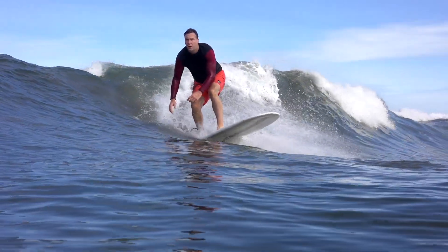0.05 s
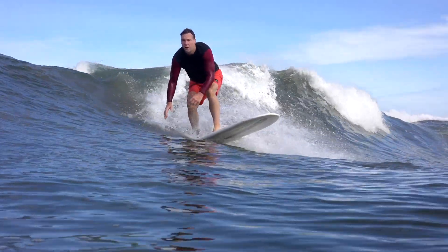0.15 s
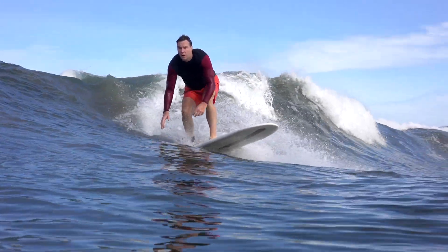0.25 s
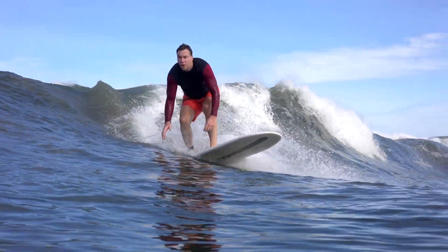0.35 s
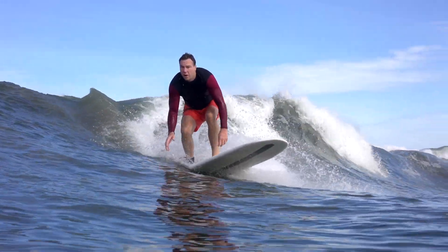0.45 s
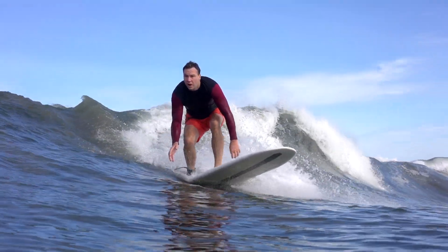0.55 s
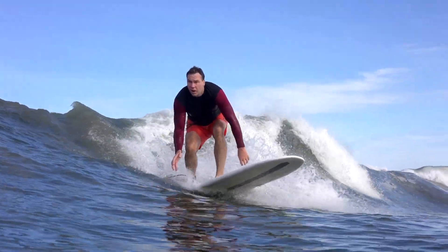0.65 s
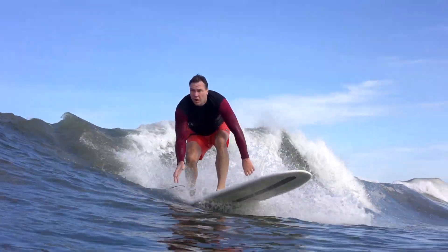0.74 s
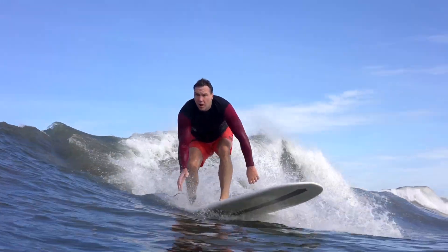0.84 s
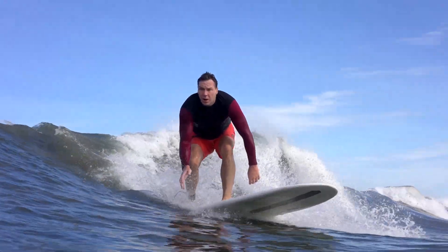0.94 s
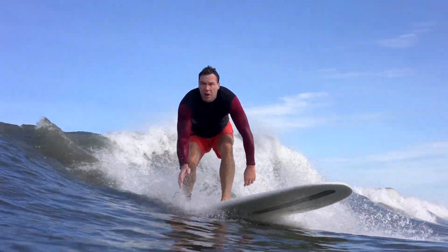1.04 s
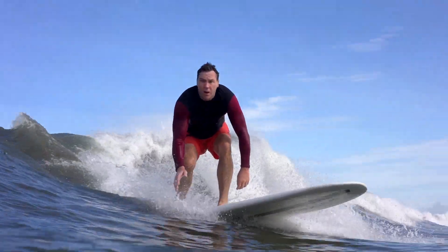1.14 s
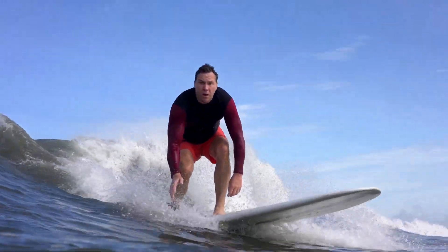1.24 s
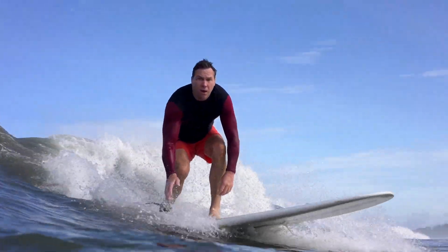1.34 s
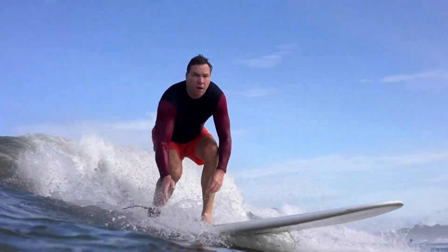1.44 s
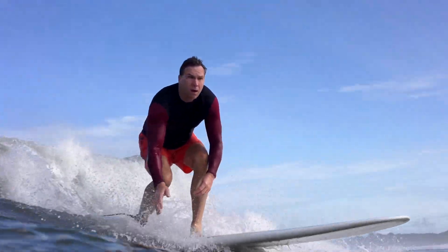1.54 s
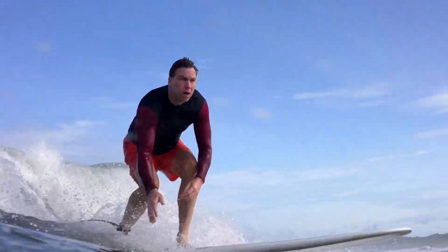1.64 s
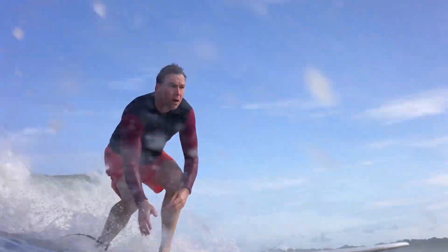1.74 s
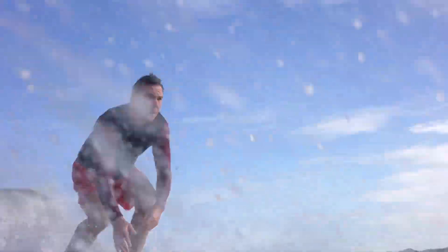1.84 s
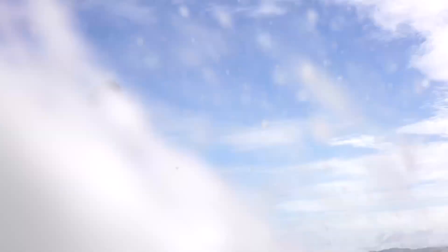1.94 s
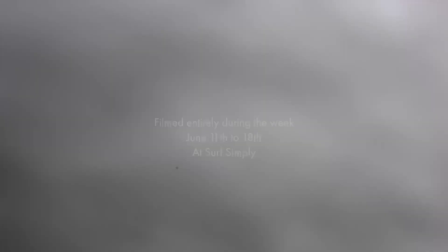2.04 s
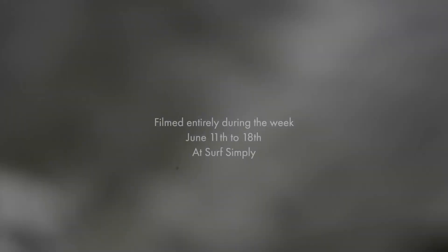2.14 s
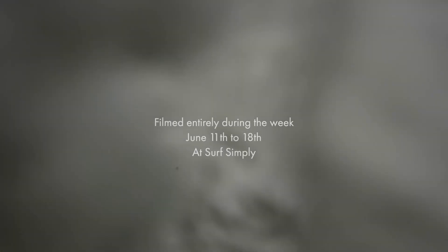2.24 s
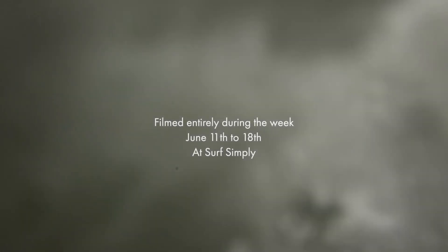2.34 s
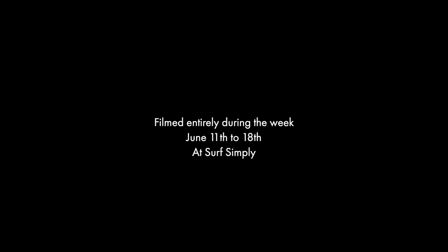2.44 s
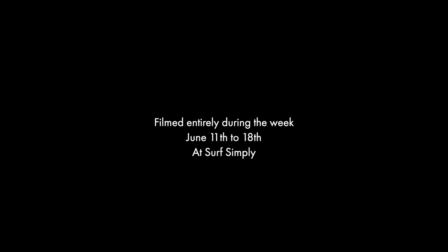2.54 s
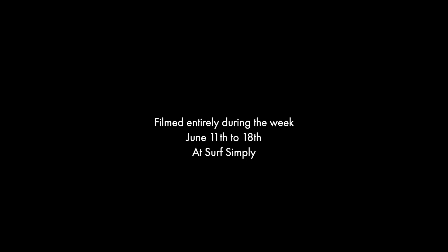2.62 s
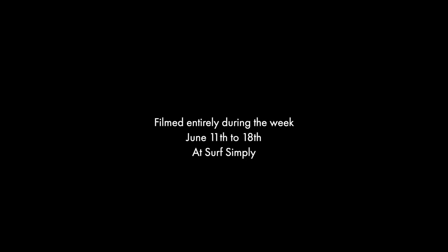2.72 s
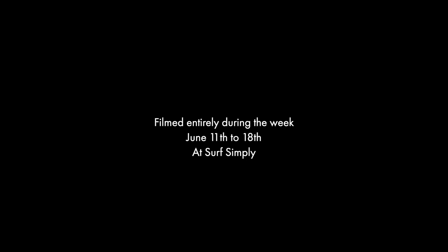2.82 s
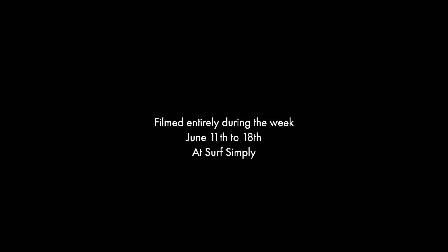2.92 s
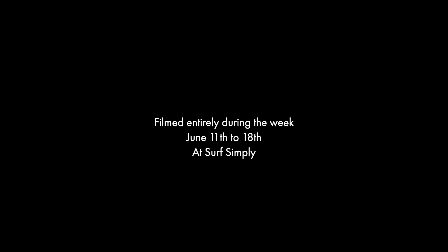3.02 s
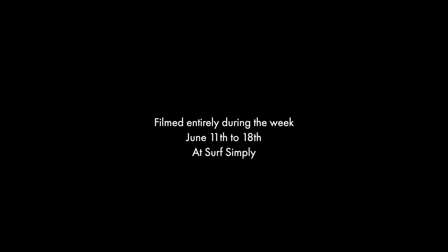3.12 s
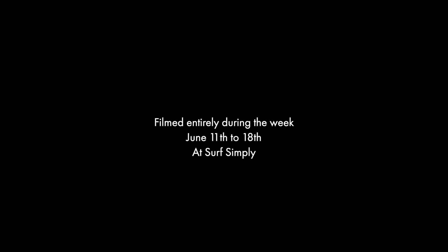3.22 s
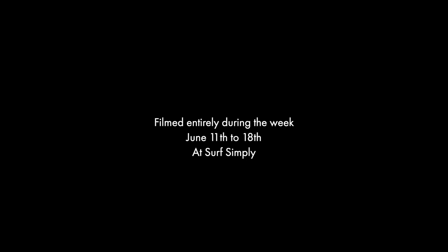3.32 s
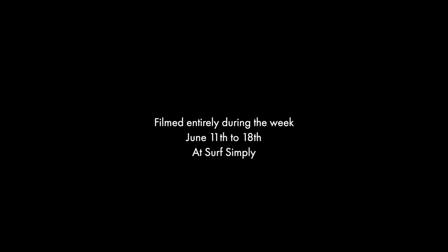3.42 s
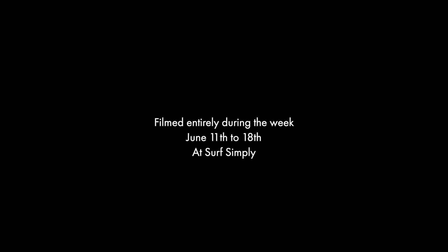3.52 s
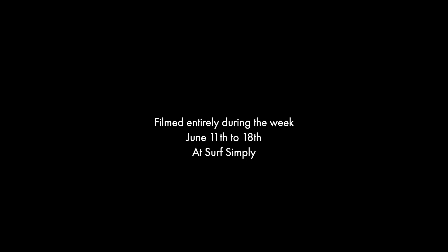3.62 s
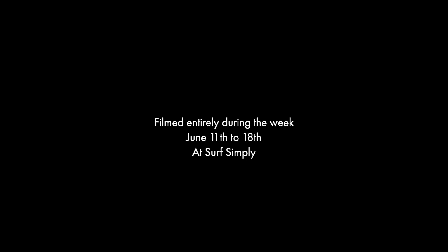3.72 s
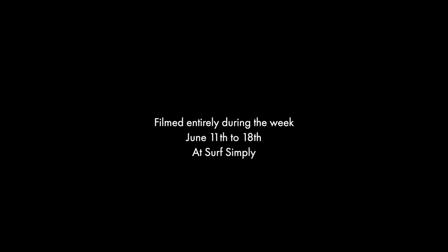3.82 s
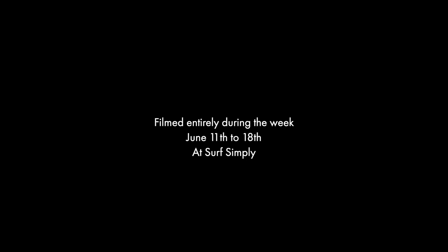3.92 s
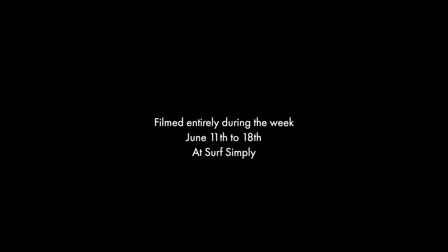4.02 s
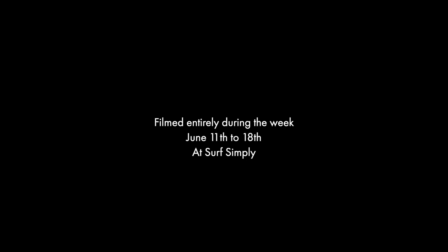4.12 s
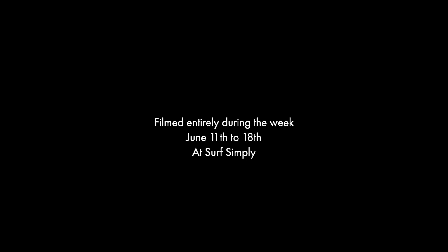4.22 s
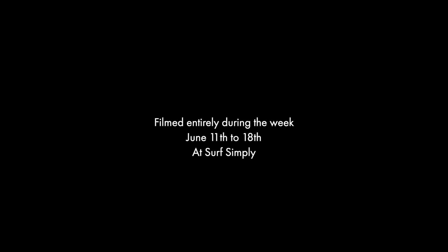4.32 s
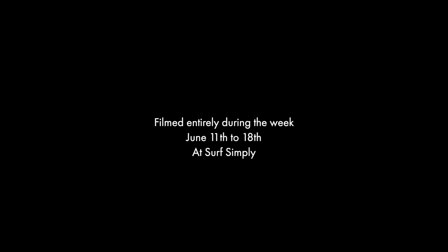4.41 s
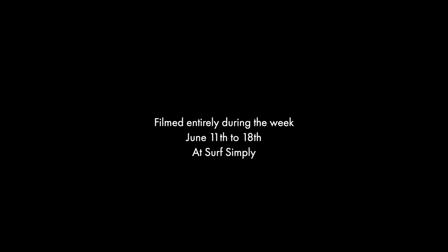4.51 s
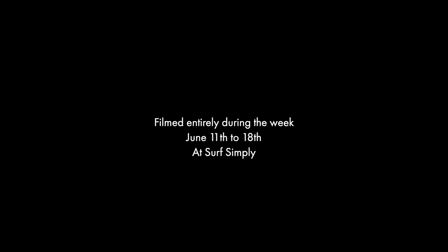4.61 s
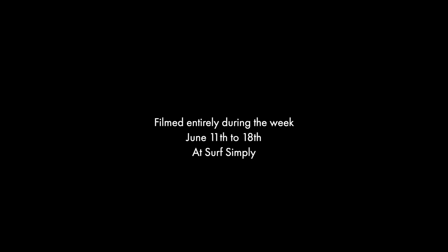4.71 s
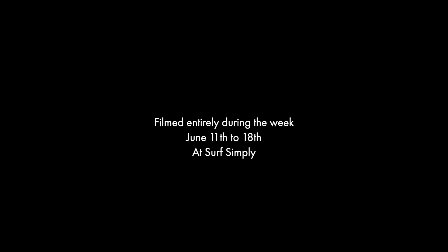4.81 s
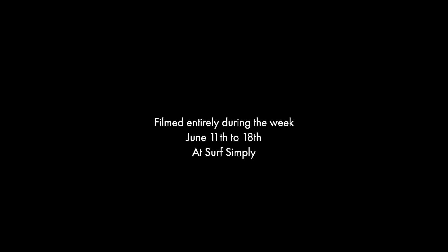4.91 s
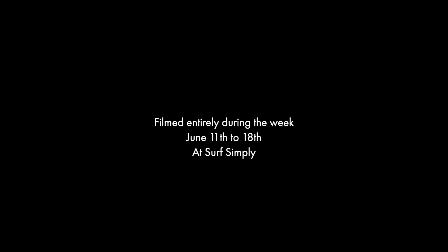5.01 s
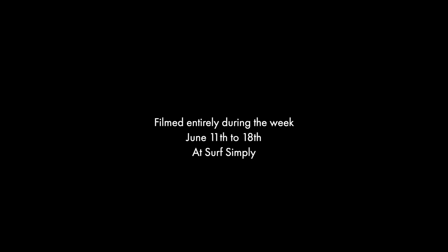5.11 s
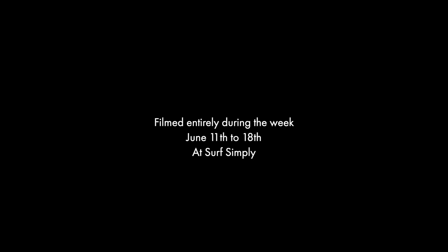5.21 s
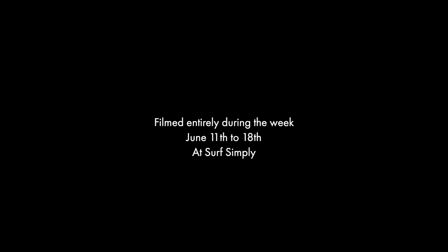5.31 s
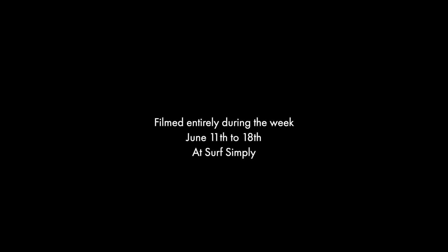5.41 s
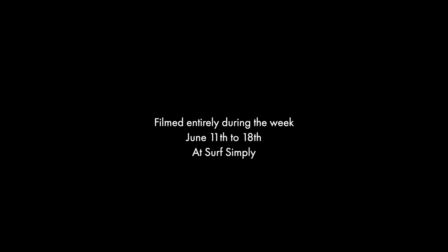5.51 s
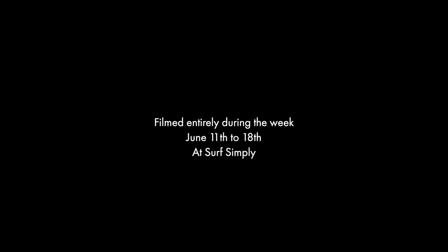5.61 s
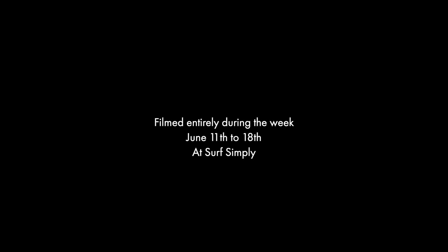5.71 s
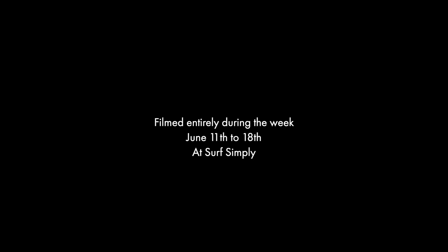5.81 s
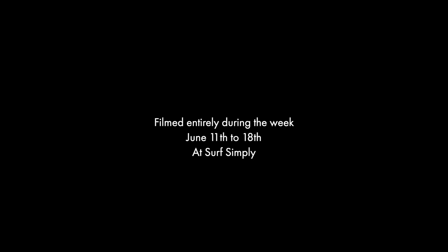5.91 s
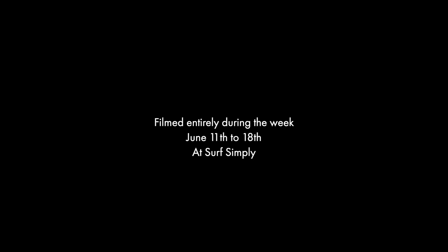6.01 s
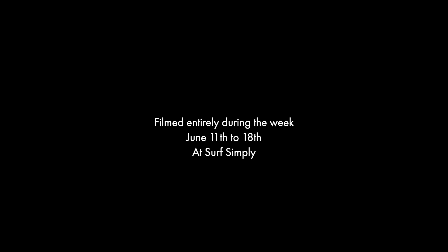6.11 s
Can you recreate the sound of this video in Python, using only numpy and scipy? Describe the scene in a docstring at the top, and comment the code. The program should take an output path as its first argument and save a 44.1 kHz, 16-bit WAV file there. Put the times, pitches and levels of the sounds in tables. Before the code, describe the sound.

Close on the water, a thin wash of surf grows into a bright rushing hiss, then a wave slams over the microphones inside a sealed plastic casing. Low turbulent rumble and gulps follow, fading to a muffled near-hush underwater. A splash breaks it, then hollow thumps, plasticky slaps, bubbles and draining drips continue in irregular surges.

```python
"""Water slaps and churns on the walls of a sealed plastic camera housing afloat in the surf, and they ring.
A wave nears, slams over it, ducks it under, and it surfaces in draining foam. Shaped noise makes the churn,
short bursts and tones the drops; their pushes excite wall modes, alike or opposed in the two microphones.
Low noise of turbulence and rising gulps of air move the whole body. Faint surf and hiss lie behind."""
import sys
import numpy as np
from scipy import signal
from scipy.fft import rfft, irfft
from scipy.io import wavfile
from scipy.ndimage import uniform_filter1d

SR = 44100
rng = np.random.default_rng(int(sys.argv[2]) if len(sys.argv) > 2 else 0)


def persist_wave(psi):
    """Save psi, clipped to +-1, as 16-bit WAV."""
    counts = np.round(np.clip(psi, -1, 1) * 32767).astype(np.int16)
    wavfile.write(sys.argv[1], SR, np.atleast_2d(counts).T)


N = 271215  # length in samples

# Churn of water on the walls, before random flecks: [t/s, wash level/dB, spray level/dB, fizz level/dB]
CHURN_LEVELS = [(0.0, -43.5, -51.5, -61), (0.31, -44, -51, -57.5), (0.58, -40.5, -44, -46),
                (0.86, -33, -35.5, -39), (1.35, -31, -34.5, -35.5), (1.66, -26, -30, -26),
                (1.8, -15.5, -21.5, -21.5), (1.93, -19.5, -25, -27.5), (2.12, -22.5, -30, -35),
                (2.28, -29.5, -35.5, -38), (2.43, -42.5, -41, -48), (2.68, -52, -63, -61),
                (2.95, -61, -74.5, -83), (3.16, -48, -69, -68), (3.24, -31, -25.5, -38),
                (3.34, -33, -29, -31), (3.7, -41.5, -45, -52), (3.99, -40, -40.5, -48.5),
                (4.45, -30.5, -42, -51), (4.77, -33.5, -48.5, -51), (5.0, -48.5, -60, -63),
                (5.21, -34, -54, -55), (5.65, -41, -49.5, -58), (5.93, -30.5, -51, -50),
                (6.15, -48.5, -38, -61)]
# Pitch ranges of wash, spray and fizz: [lowest f/Hz, highest f/Hz]
CHURN_BANDS = [(880, 1700), (2200, 6000), (6000, 16000)]
# Turbulence shoving the body, before random lumps: [t/s, low level/dB, middle level/dB, upper level/dB]
SHOVE_LEVELS = [(0.0, -54, -64, -50.5), (0.39, -69, -57, -59), (1.63, -54.5, -42, -35.5),
                (1.8, -29.5, -28.5, -20.5), (2.14, -22, -21.5, -21), (2.5, -34, -35.5, -48),
                (2.53, -40, -37, -33), (2.6, -36, -38, -44.5), (2.91, -41.5, -36.5, -50),
                (3.05, -40, -38, -35.5), (3.37, -38, -33, -46.5), (3.84, -45, -32, -44.5),
                (3.89, -28, -20.5, -36), (4.02, -21, -27.5, -38), (4.08, -22, -21, -36.5),
                (4.2, -27.5, -11.5, -38), (4.25, -45, -27.5, -34), (4.33, -49, -32, -33.5),
                (4.97, -55, -41.5, -41), (5.38, -44.5, -37, -32.5), (5.7, -54.5, -44, -56),
                (5.75, -50, -39, -47), (5.84, -47, -51.5, -36), (6.15, -42, -47.5, -47)]
# Pitch ranges of the deep, low, middle and upper shoves: [lowest f/Hz, highest f/Hz]
SHOVE_RANGES = [(25, 65), (65, 150), (150, 350), (350, 700)]
# Tone colour of the shoves: [f/Hz, level per Hz/dB]
SHOVE_TONE = [(15, -66.5), (25, -67.5), (81, -4.5), (130, 2), (200, -1.5), (246, -0.5), (537, -19.5),
              (592, -20.5), (700, -32.5), (910, -24.5), (1540, -120)]
# Rocking of the body, opposite in the two microphones: [f/Hz, width/Hz, level/dB]
BODY_ROCKING = (144, 20, -9)
# Clearest drops, slaps and pops on the walls:
# [t/s, level/dB, centre f/Hz, spread/octaves (at least 0.06), one-sided share/0-1, length/ms (at least 1)]
WALL_DROPS = [(1.597, 11, 9100, 0.33, 0.44, 2.5), (1.623, 7, 9200, 0.83, 0.6, 9.2),
              (1.632, -2.5, 1556, 0.2, 0.47, 4.4), (1.64, 11, 8500, 0.36, 0.53, 1.9),
              (1.66, 8, 10000, 1.1, 0.45, 14), (1.687, 7.5, 6860, 1.37, .6, 7.3),
              (1.714, 12, 10600, 0.49, 0.6, 2.3), (1.863, 3, 7700, 1.2, 1, 8.7),
              (2.212, -1.5, 3190, 1.14, 0.28, 18), (2.244, -5, 8950, .31, 0.5, 6.4),
              (2.258, -8, 1120, 1.2, 0.84, 14), (2.394, -7, 9200, 0.49, .44, 3.7),
              (2.5, -24, 2420, .082, .66, 3.2), (2.532, -14, 950, 0.38, 0.07, 3.9),
              (2.57, -21, 912, 0.17, 0.03, 8.9), (2.6, -26, 3660, 0.27, 0.4, 6),
              (2.602, -12, 9700, 0.11, 0.6, 1.6), (2.617, -18.5, 7200, 0.46, 0.5, 3.2),
              (2.63, -24, 715, 0.16, .2, 6), (2.689, -16, 923, 0.26, 0.12, 4.3),
              (2.788, -40.5, 2010, 0.34, .1, 8), (2.868, -29, 1460, 0.32, 0.2, 10.6),
              (3.111, -28.5, 4040, 0.077, 0.67, 17), (3.153, -23.5, 2120, 0.76, 0.14, 4),
              (3.171, -18, 4200, 0.65, .5, 13), (3.202, -14.5, 1510, 0.38, 0.57, 9),
              (3.204, -8.5, 4260, 2.1, 0.5, 28), (3.247, -4, 10100, .15, 0.68, 13),
              (3.37, 3.5, 12600, 0.091, 0.47, 3.5), (3.435, 0.5, 11000, 0.64, 0.75, 1.1),
              (3.473, -15, 1810, 1.1, 0.2, 25), (3.51, -5, 2445, 0.2, 0, 5.5),
              (3.573, -11.5, 4600, 1.6, 0.2, 9.4), (3.629, -11.5, 4890, 0.71, .63, 8.8),
              (3.743, -13.5, 5850, 0.39, 0.56, 3), (3.764, -16.5, 3900, .074, 0.66, 8.3),
              (3.889, -17.5, 1304, 0.2, .91, 5.8), (3.911, -16, 10400, 0.098, 0.6, 4),
              (4.021, -5.5, 4300, 0.21, 0.46, 1.8), (4.042, -9.5, 2330, 0.3, 0.5, 5.4),
              (4.046, -11.5, 8000, 1.5, 0.44, 9.6), (4.041, -8, 12300, 0.11, .46, 5),
              (4.066, -9.5, 5660, .15, 0.55, 5.9), (4.125, -5, 4530, 0.13, 0.64, 1.4),
              (4.232, -8, 1360, .38, .63, 2.4), (4.276, -17.5, 2250, 0.9, 0.55, 12),
              (4.294, -6, 820, .11, 0.28, 1.9), (4.328, -10.5, 2970, 0.36, 0.85, 8.5),
              (4.35, -3.5, 854, .053, .2, 3.2), (4.363, -1, 5390, 1.1, 0.82, 5.4),
              (4.386, -6.5, 13000, 0.4, 0.6, 9.3), (4.398, -9, 860, 0.32, 0.96, 3.8),
              (4.403, -9, 2300, 0.38, 0.8, 6), (4.465, -15.5, 980, 0.62, 1, 5.5),
              (4.479, -10, 970, .46, 0.64, 5.7), (4.501, -3, 3650, 0.71, 0.64, 6.5),
              (4.531, -10.5, 1460, 1.4, 0.63, 9), (4.557, -3, 5500, 0.52, 0.53, 2.9),
              (4.584, -17.5, 986, .17, 0.35, 4.8), (4.6, -10.5, 8500, 0.9, 0.4, 10),
              (4.608, -13, 1280, 0.38, 0.68, 6), (4.674, -21, 3810, 1.2, 0, 1.5),
              (4.689, -16.5, 890, 0.089, 0.16, 2.8), (4.741, -12.5, 2540, 2.1, 0.45, 8.5),
              (4.8, -19, 1160, 0.35, 0.35, 10), (4.808, -15, 8400, 0.22, .36, 3.8),
              (4.937, -7.5, 10800, 0.56, 0.7, 3.8), (5.159, -22, 4120, .12, 0.97, 4.4),
              (5.223, -12, 2310, 2.5, 0.75, 49), (5.234, -14, 780, 0.22, 0.86, 2.3),
              (5.255, -7.5, 7300, 0.39, 0.7, 11), (5.277, -9.5, 1100, 0.46, .5, 7),
              (5.335, -16, 826, 0.6, 0.94, 21), (5.37, -17.5, 3600, .3, .35, 4.9),
              (5.402, -13, 850, 0.33, 0.94, 1.4), (5.429, -15, 960, .74, 0.5, 4.3),
              (5.442, -21, 2970, 0.37, 0.6, 12), (5.461, -11, 4520, 0.085, 0.5, 2.3),
              (5.582, -11, 1600, 0.44, 0.68, 10.7), (5.619, -4.5, 697, .19, 0.59, 2.1),
              (5.694, -10, 3360, 0.15, 0.2, 3.7), (5.742, -18.5, 1520, 0.48, 0.7, 6.2),
              (5.753, -9, 760, 0.4, 0.23, 11.6), (5.802, -4.5, 3080, 0.21, 0.98, 0.69),
              (5.813, -17, 1370, 1.2, 0.55, 11), (5.859, -14, 4470, 1.8, .3, 2.6),
              (5.876, -6, 8750, 0.31, 0.66, 2.2), (5.899, -12, 1020, .77, 0.6, 10),
              (5.927, -11.5, 2940, 2.3, .6, 13), (5.95, -14.5, 820, 0.43, 0.3, 12),
              (5.973, -14, 2060, 0.59, 0.78, 5.5), (5.991, -16.5, 2330, 0.21, .3, 5.5),
              (6.032, -2.5, 4700, 0.63, 0.5, 4.2), (6.094, -1.5, 4870, 0.77, 0.5, 3.7),
              (6.118, -17, 6270, 0.28, 0.5, 6.9)]
# Air pockets gulping against the body: [t/s, level/dB, f/Hz at the middle, length/ms (at least 5)]
AIR_GULPS = [(1.697, -17.5, 414, 8.3), (1.82, -15.5, 200, 6), (1.832, -11, 297, 4), (1.879, -15, 168, 6.5),
             (2.055, -12, 176, 3.6), (2.152, -32, 171, 7.2), (2.368, -14, 201, 4.2), (2.536, -24, 435, 16),
             (3.284, -27, 245, 5.3), (3.348, -27, 172, 21), (3.575, -20.5, 292, 3),
             (3.634, -17.5, 222, 5.2), (3.889, -10, 159, 11), (3.909, -7.5, 238, 4.1),
             (3.955, -15.5, 123, 38), (4.091, -6, 268, 2.6667), (4.167, -7, 236, 8), (4.179, -12, 190, 17),
             (4.208, -23, 274, 4.4), (4.326, -19, 302, 16), (4.348, -18, 284, 3.6), (4.383, -16.5, 282, 10),
             (4.508, -20, 330, 13), (4.642, -14, 366, 4.2), (4.669, -23.5, 373, 7.3),
             (4.706, -18.5, 358, 6.1), (5.404, -22.5, 235, 11), (5.742, -20, 267, 3.5),
             (5.766, -21, 332, 9.6), (5.925, -19.5, 500, 11), (6.033, -25.5, 93, 13)]
# Ringing modes of the housing: [f/Hz, width/Hz, level/dB, left over right/dB, 1 alike or -1 opposed]
HOUSING_MODES = [(837, 33, 42.5, 1.5, -1), (945, 64, 31.5, -5, 1), (1150, 50, 13, -11, 1),
                 (1297, 73, 33.5, 1, 1), (1480, 64, 18.5, -19.5, 1), (1569, 63, 34.5, 4, -1),
                 (1940, 55, 13, 10, -1), (2431, 133, 20.5, -9.5, 1), (2860, 76, 14, 11.5, -1),
                 (3310, 38, 5, 22.5, -1), (3550, 114, 1, 25, -1), (3896, 140, 15, 1, 1),
                 (4294, 72, 1.5, 27.5, 1), (4560, 130, 2.5, 17, 1), (4800, 220, 8.5, -4, -1),
                 (4850, 47, 5, -14.5, 1), (6070, 150, -0.5, -3, -1), (6300, 150, -37.5, -11, 1),
                 (6820, 70, -3, -16, 1), (7800, 400, 0.5, -13.5, 1), (8400, 590, -2, 9, -1),
                 (9010, 130, -5.5, -26.5, 1), (10070, 470, -4.5, -9, 1), (10820, 180, -2.5, -14, 1)]
# What the walls pass between the modes: [f/Hz, even push level/dB, one-sided push level/dB]
WALL_PASS = [(199, 17.5, -37.5), (504, 18, 8.5), (780, 22.5, 36), (1112, 22, 20), (1730, -31, -18),
             (2040, 7, 4), (2990, 1, 11.5), (5300, 0, -2.5), (8000, -1.5, -1.5), (11900, -5.5, -5.5),
             (15700, -7, -9.5)]
# Share of small drops in the churn, none while the walls are dry: [t/s, share/0-1]
FLECK_SHARE = [(0, 0), (1.55, 0), (1.6, .4), (1.9, .3), (2.4, .3), (3.15, .3), (3.5, .4), (3.8, .72),
               (6.15, .72)]
# Wall panels favoured by the nearing wave, heard through the air: [f/Hz, width/Hz, level over the wash/dB]
WALL_PANELS = [(1421, 26, 20.5), (1518, 30, 19.5), (2270, 160, -14), (3923, 62, 3.5), (4900, 160, 2),
               (6860, 110, 6.5), (8880, 650, 2.5)]

HISS_DB, EDGE_HZ = -80, 16000  # self-noise and top edge of the microphones
FAR_DB = -79  # steady faint push of distant surf on the walls
LANDS_S, DRY_DB = 1.597, -5.5  # the wave hits the walls; until then little passes between the panels
UNDER_S, UP_S, TURN_S = 1.69, 3.7, 0.087  # starts to duck under, is up again, time either takes
LEAN_DB, LEAN_UNDER_DB = -2, 2.5  # one-sided over even push in the lower tones, afloat and under water
DEEP_DB, DEEP_UNDER_DB = -16.5, -2.5  # deep shoves over low ones, afloat and under water
LUMP_DB, LUMP_S = [4.5, 3.6, 2.7, 3.6], 0.085  # random lumps: depth from deep to upper band, and length
# Draining foam drips at random once the body is coming up.
DRIPS_FROM_S, DRIPS_PER_S = 3.3, 80
DRIP_DB, DRIP_RANGE_DB, DRIP_LOW_HZ, DRIP_HIGH_HZ = -25, 8, 748, 13240  # mid level, full range, pitch limits
DRIP_OCTAVES, DRIP_SHARE, DRIP_MS = 0.11, 0.8, 6.2  # middle of the random range of each
DRIP_FOLLOW, DRIP_AT_DB = 0.82, -42.5  # share of the spray's swell that drips follow, about this spray level


def amp(db):
    """Turns a level in dB into a gain."""
    return 10 ** (np.asarray(db) / 20)


def evened(x):
    """Scales a signal to rms 1."""
    return x / np.sqrt(np.mean(x ** 2) + 1e-20)


def read(hz, f, value):
    """Reads a curve along a log-frequency axis, as the ear spaces pitch."""
    return np.interp(np.log(hz + 1), np.log(np.asarray(f) + 1), value)


def add(mix, s, sound):
    """Mixes a sound in at s seconds, cutting what runs past the end."""
    part = mix[..., round(s * SR):][..., :sound.shape[-1]]
    part += sound[..., :part.shape[-1]]


def noise(db, size):
    """Makes noise from random short spectra with levels db (bins x frames); 0 dB everywhere gives rms 1."""
    real, imaginary = rng.standard_normal((db.shape[1], db.shape[0], 2)).T
    spectra = np.sqrt(2 / size) * amp(db) * (real + 1j * imaginary)
    return signal.istft(spectra, nperseg=size, noverlap=size * 3 // 4)[1][:N]


def band_db(hz, power, band):
    """Finds the level that white noise of rms 1 keeps in a band after a filter."""
    inside = (hz >= band[0]) * (hz < band[1])
    return 10 * np.log10(np.mean(power * inside))


def under(t):
    """Gives 0 while the body floats and 1 while it is ducked under."""
    return np.clip(np.minimum(t - UNDER_S, UP_S - t) / TURN_S, 0, 1)


def distant_surf():
    """Far surf pushes the walls faintly and steadily: plain noise in the even and one-sided push."""
    return amp(FAR_DB) * rng.standard_normal((2, N))


def shove():
    """Turbulence shoves the body: low noise in four bands whose levels drift in random lumps."""
    frames, hz = N // 256 + 5, np.fft.rfftfreq(1024, 1 / SR)
    t = np.arange(frames) * 256 / SR
    s, *columns = np.transpose(SHOVE_LEVELS)
    low, middle, upper = (np.interp(t, s, column) for column in columns)
    deep = low + DEEP_DB + (DEEP_UNDER_DB - DEEP_DB) * under(t)
    memory = np.exp(-256 / SR / LUMP_S)
    lumps = signal.lfilter([1], [1, -memory], rng.standard_normal((frames, 4)).T)
    colour = read(hz, *np.transpose(SHOVE_TONE))
    # Allow for what the tone colour itself leaves in each band.
    levels = np.array([level - band_db(hz, amp(colour) ** 2, band)
                       for level, band in zip((deep, low, middle, upper), SHOVE_RANGES)])
    levels += np.array(LUMP_DB)[:, None] * evened(lumps)
    weights = np.array([read(hz, [45, 100, 240, 480], row) for row in np.eye(4)])  # blends bands over pitch
    return noise(weights.T @ levels + colour[:, None], size=1024)


def gulps():
    """Each air pocket swings a few cycles, its pitch rising as it shrinks."""
    out, t = np.zeros(N), np.arange(-1024, 1024) / SR
    for (s, db, hz, ms), turn in zip(AIR_GULPS, rng.random(len(AIR_GULPS))):
        swing = np.cos(2 * np.pi * (hz * t * (1 + 5.8 * t) + turn))
        swell = np.exp(-(1500 * t / max(ms, 5)) ** 2)
        add(out, s - 1024 / SR, amp(db) * swing * swell)  # the swell peaks at s
    return out


def body(push):
    """Low pushes reach both microphones alike and also rock the body, with opposite sign in each."""
    f, width, db = BODY_ROCKING
    rock = amp(db) * signal.lfilter(*signal.iirpeak(f, f / width, SR), push)
    slope = np.diff(push, prepend=0) * SR / (2 * np.pi * 250)
    rock += amp(-21.0) * slope  # a slight lag between the two microphones
    return np.array([push + rock, push - rock])


def drips():
    """Draining foam drips at random, louder where the spray swells; rows like those of WALL_DROPS."""
    span = N / SR - DRIPS_FROM_S
    when, size, pitch, wide, side, long = rng.random((int(span * DRIPS_PER_S), 6)).T
    s = DRIPS_FROM_S + span * when
    spray_db = np.interp(s, *np.transpose(CHURN_LEVELS)[[0, 2]])
    db = DRIP_DB + DRIP_FOLLOW * (spray_db - DRIP_AT_DB) + DRIP_RANGE_DB * (size - .5)
    centre_hz = DRIP_LOW_HZ * (DRIP_HIGH_HZ / DRIP_LOW_HZ) ** pitch
    octaves = 2 * DRIP_OCTAVES * wide
    share = DRIP_SHARE + .5 * (side - .5)
    return list(zip(s, db, centre_hz, octaves, share, DRIP_MS * (.5 + long)))


def drops():
    """Each drop is a burst of noise or a ringing bubble about its centre, shared between the two pushes."""
    out, t, hz = np.zeros((2, N)), np.arange(2048) / SR, np.fft.rfftfreq(2048, 1 / SR)
    rows = list(WALL_DROPS) + drips()
    bursts = rng.standard_normal((len(rows), 2, 2048))
    for (s, db, centre_hz, octaves, share, ms), burst in zip(rows, bursts):
        octaves, ms = max(octaves, .06), max(ms, 1)
        shape = np.exp(-(np.log2((hz + 1) / centre_hz) / (2 * octaves)) ** 2)
        envelope = (1 - np.exp(-t / (0.00022 * ms))) * np.exp(-900 * t / ms)
        burst = irfft(rfft(burst) * shape)
        burst /= abs(signal.hilbert(burst)) ** 0.27 + 1e-9  # a ringing bubble beats less than plain noise
        bubble = np.sin(2 * np.pi * centre_hz * t)
        # Narrow, low drops are bubbles: nearly pure tones.
        ring = np.clip(1.2 - 3.0 * octaves, 0, .9) * (centre_hz < 3000)
        burst = (np.sqrt(1 - ring) * evened(burst) + np.sqrt(2 * ring) * bubble) * envelope
        energy = np.sqrt(ms) * np.mean(shape ** 2) / octaves  # longer drops carry more
        burst *= np.sqrt(energy / (burst ** 2).sum(1, keepdims=True))
        share = np.clip(share, 0, 1)
        add(out, s, amp(db) * burst * np.sqrt([[1 - share], [share]]))
    return out


def spatter(frames, hz):
    """Many small drops and bubbles, sparse in time, narrow in pitch, dying fast: power of mean about 1."""
    centres = np.geomspace(600, 15000, num=24)
    hit = rng.random((frames, 24)) < 600 * 32 / SR / 24  # about 600 drops a second
    size = amp(4.5 * np.minimum(rng.exponential(1, (frames, 24)), 3.5)) ** 2 * hit
    size = uniform_filter1d(size, size=3, axis=0)
    size = signal.lfilter([1], [1, -.8], size, axis=0)  # each drop dies away
    size = size @ np.exp(-(np.log2((hz + 1) / centres[:, None]) / .16) ** 2)
    return size.T / (size.mean(0)[:, None] + 1e-9)


def water(hz_fine, power):
    """Churning water pushes the walls evenly and one-sidedly: two noises, one level field, small drops."""
    frames, hz = N // 32 + 5, np.fft.rfftfreq(128, 1 / SR)
    t = np.arange(frames) * 32 / SR
    s, *columns = np.transpose(CHURN_LEVELS)
    levels = np.array([np.interp(t, s, column) for column in columns])
    # Allow for what the housing passes in each band.
    levels -= np.array([[band_db(hz_fine, power[0].mean(0), band)] for band in CHURN_BANDS])
    weights = np.array([read(hz, [1500, 2600, 8000], row) for row in np.eye(3)])
    field = weights.T @ levels
    lean = LEAN_DB + (LEAN_UNDER_DB - LEAN_DB) * under(t)
    lean = lean * np.clip(1.5 - hz / 2000, 0, 1)[:, None]  # fades out from 1 to 3 kHz
    wet = np.clip(np.interp(t, *np.transpose(FLECK_SHARE)), 0, 1)
    surge = evened(uniform_filter1d(rng.standard_normal(frames), size=30))  # slops felt in all bands
    pushes = []
    for lean_db in (0, lean):
        flecks = 1 - wet + wet * spatter(frames, hz)
        pushes.append(noise(field + lean_db + 10 * np.log10(flecks) + 2.0 * wet * surge, size=128))
    pushes = np.array(pushes)
    panels = sum(amp(db) * signal.lfilter(*signal.iirpeak(f, f / width, SR), pushes)
                 for f, width, db in WALL_PANELS)
    landed = np.clip((np.arange(N) / SR - LANDS_S) / 0.0056, 0, 1)
    return landed * pushes + (1 - landed) * amp(DRY_DB) * (pushes + panels)


def housing():
    """The walls ring in modes: power and rings, push (even, one-sided) x microphone (left, right)."""
    hz = np.fft.rfftfreq(8192, 1 / SR)
    f, even_db, odd_db = np.transpose(WALL_PASS)
    power = amp([[read(hz, f, even_db)] * 2, [read(hz, f, odd_db)] * 2]) ** 2
    for f, width, db, tilt_db, sign in HOUSING_MODES:
        peak = (1 + ((hz - f) / width * 2) ** 2) ** -1.3
        power[int(sign < 0)] += amp([[db + tilt_db / 2], [db - tilt_db / 2]]) ** 2 * peak
    # Choose phases so that each ring starts at the push and never before it.
    log = np.log(power) / 2
    log = np.concatenate([log, log[..., -2:0:-1]], -1)
    rings = np.fft.ifft(np.exp(np.conj(signal.hilbert(log)))).real[..., :4096]
    signs = np.array([[[1], [1]], [[1], [-1]]])  # one-sided pushes come out opposed
    return hz, power, rings * signs


def scene():
    """Pushes on the walls ring through the housing; low shoves and gulps move the whole body."""
    hz, power, rings = housing()
    pushes = water(hz, power) + drops() + distant_surf()
    ringing = signal.fftconvolve(pushes[:, None], rings, axes=2)[..., :N].sum(0)
    return ringing + body(shove() + gulps())


def record(dry):
    """The microphones add self-noise, roll off the bass, overload softly and limit the treble."""
    dry = dry + amp(HISS_DB) * rng.standard_normal(dry.shape)
    dry = signal.sosfilt(signal.butter(2, 60, "high", fs=SR, output="sos"), dry)
    loud = dry / (1 + abs(dry) ** 4) ** .25
    treble_limit = signal.firwin(511, EDGE_HZ, window=("kaiser", 9), fs=SR)
    return signal.oaconvolve(loud, treble_limit[None], "same")


dry = scene()
out = record(dry)
persist_wave(out)
```